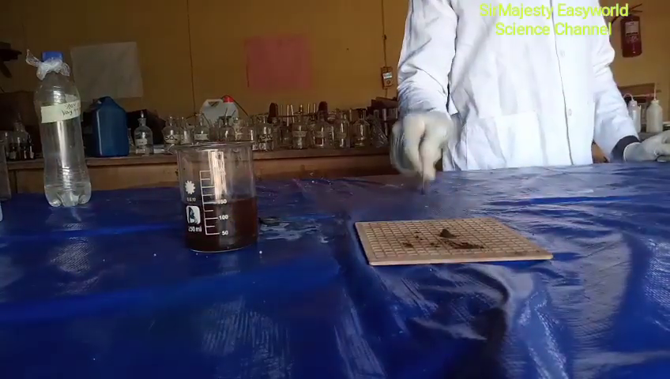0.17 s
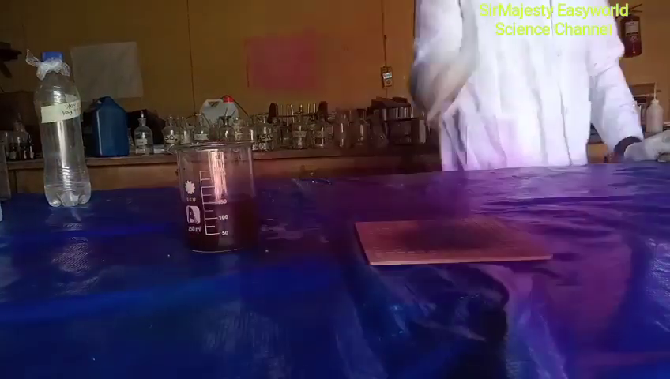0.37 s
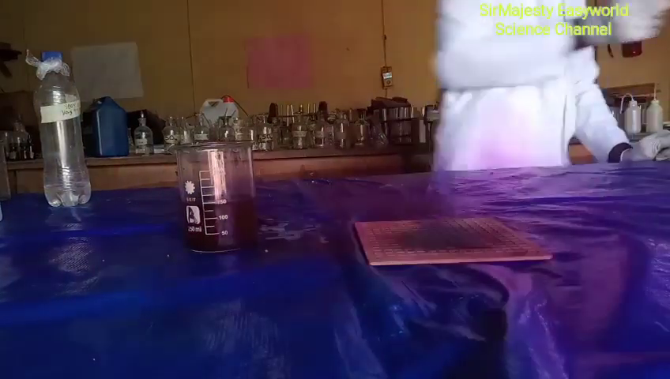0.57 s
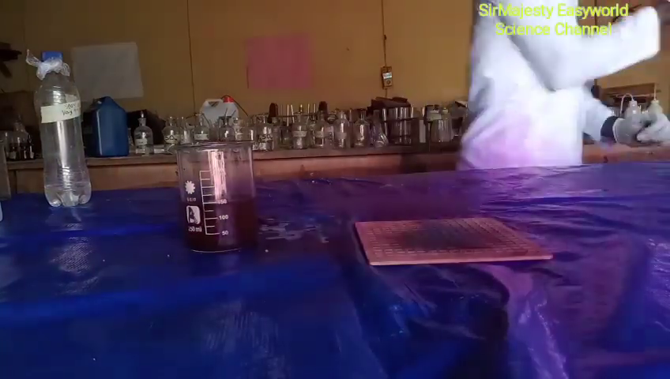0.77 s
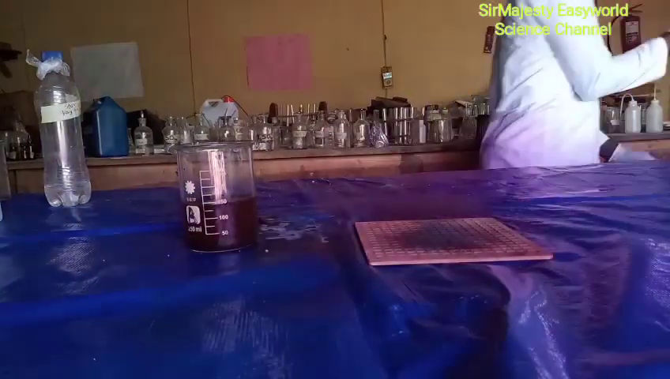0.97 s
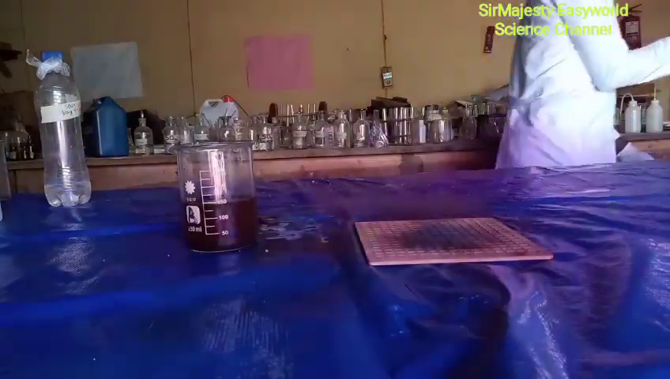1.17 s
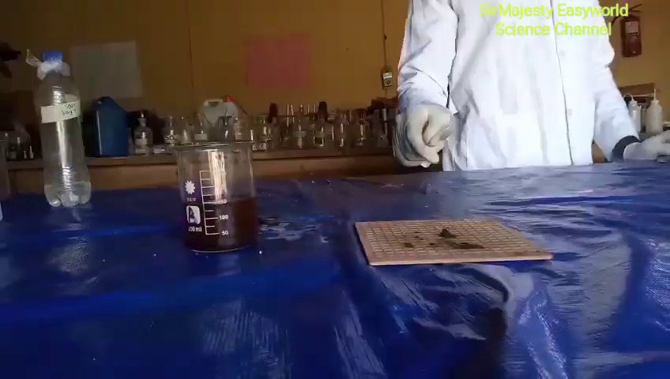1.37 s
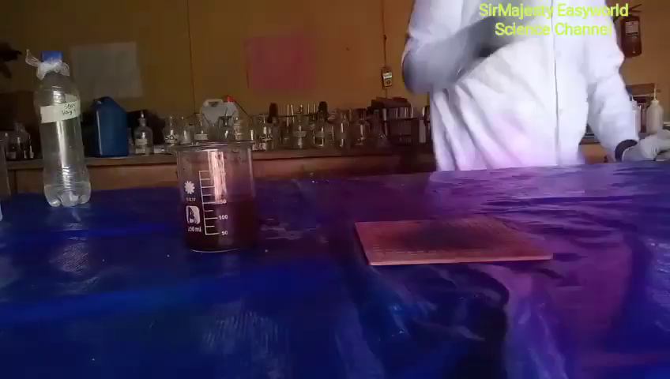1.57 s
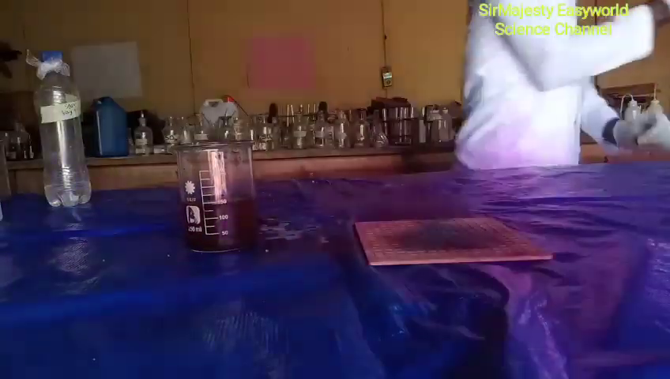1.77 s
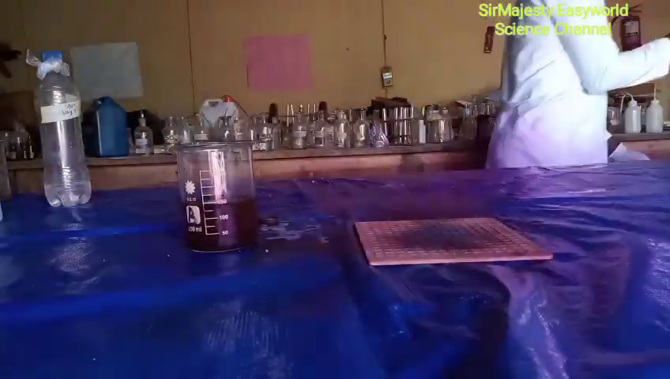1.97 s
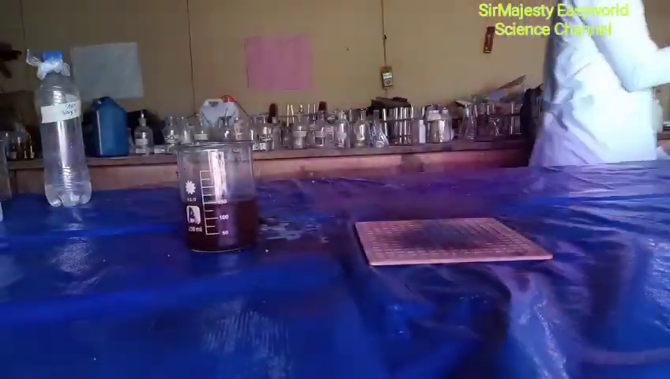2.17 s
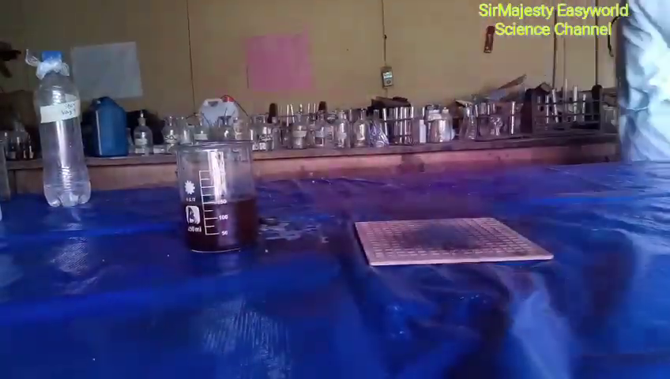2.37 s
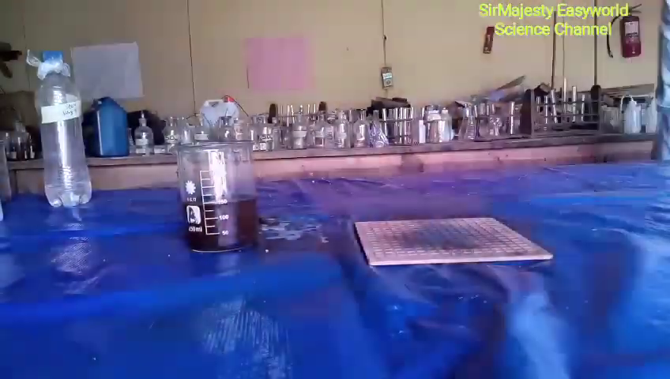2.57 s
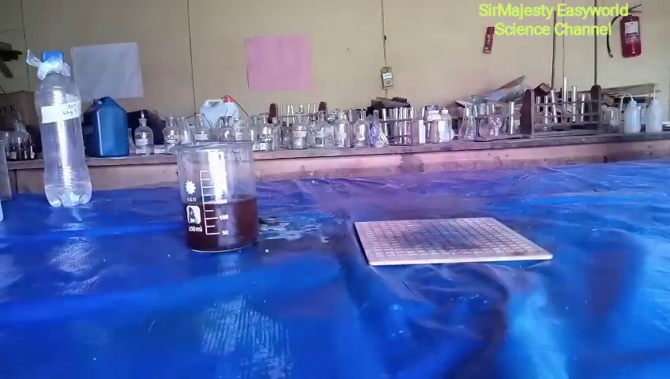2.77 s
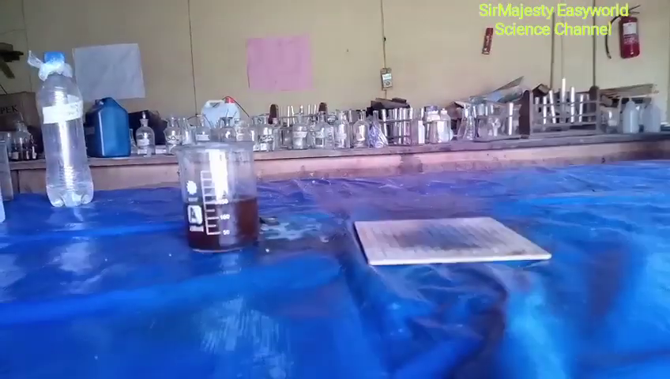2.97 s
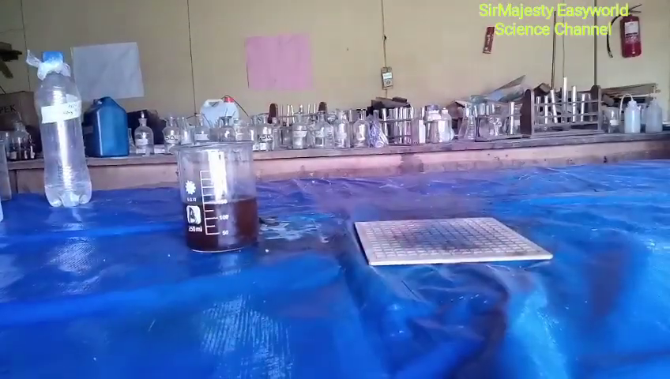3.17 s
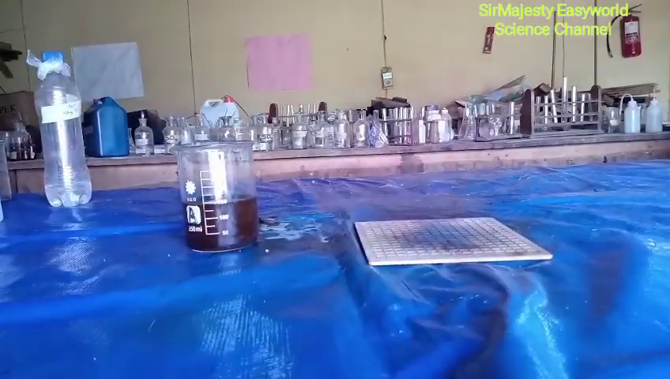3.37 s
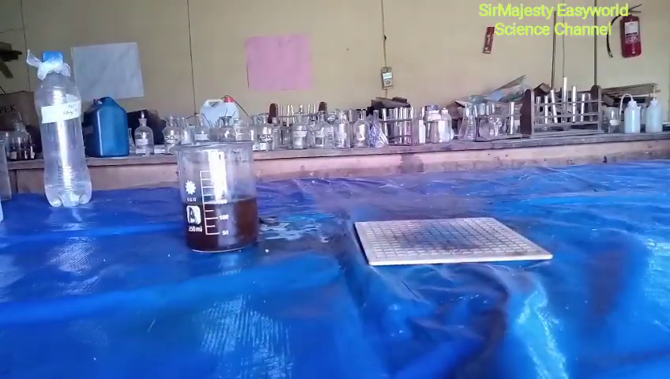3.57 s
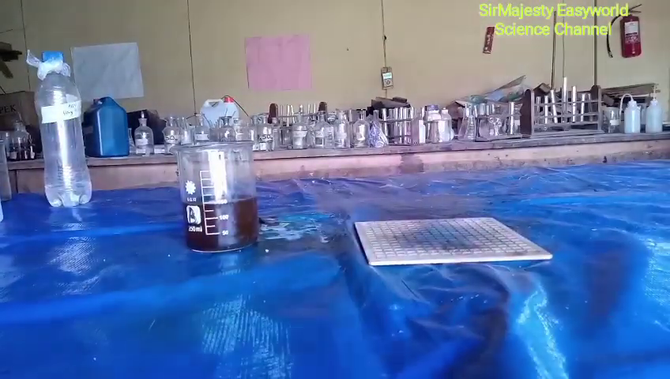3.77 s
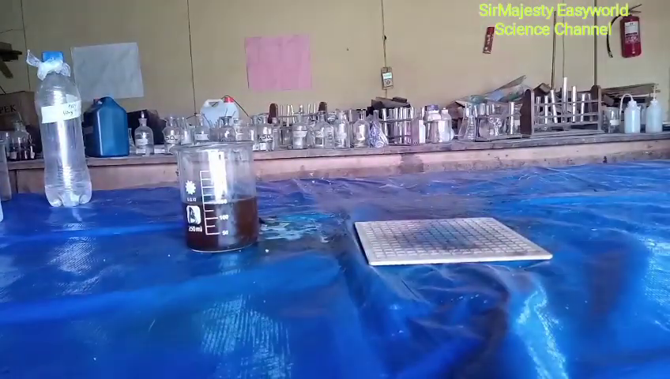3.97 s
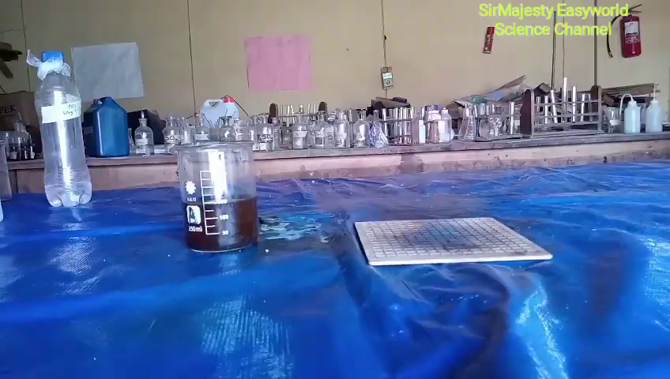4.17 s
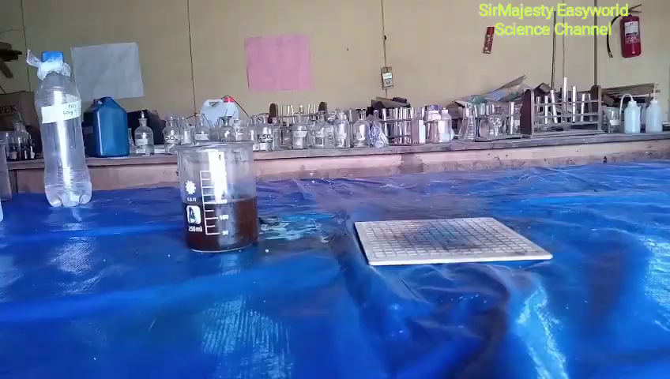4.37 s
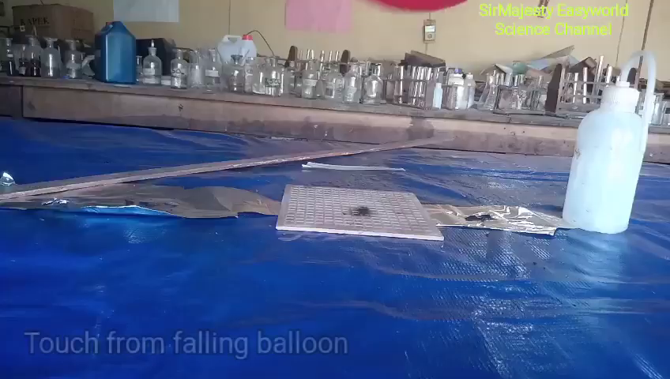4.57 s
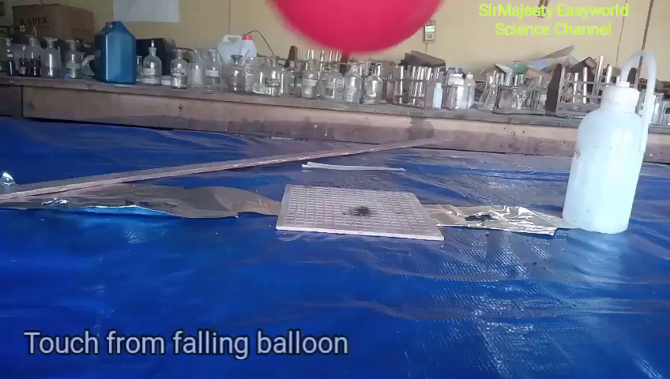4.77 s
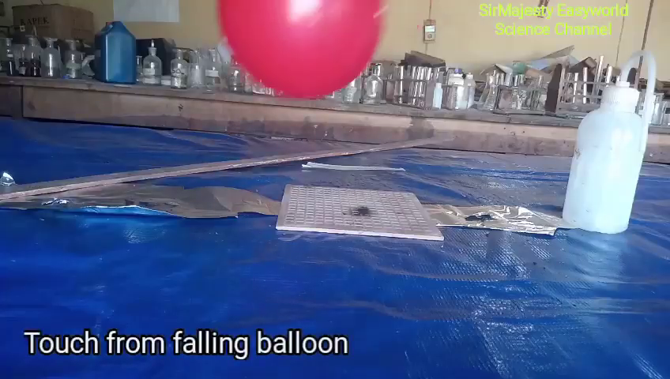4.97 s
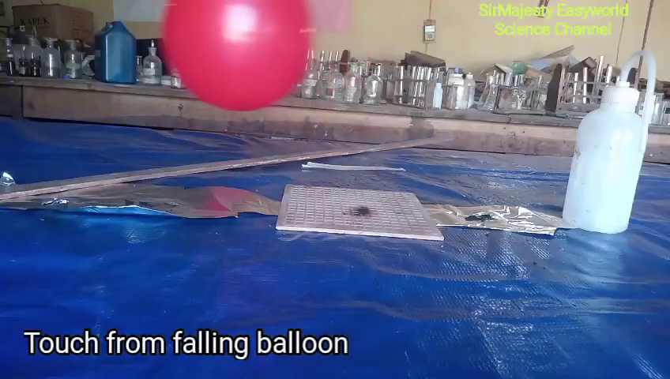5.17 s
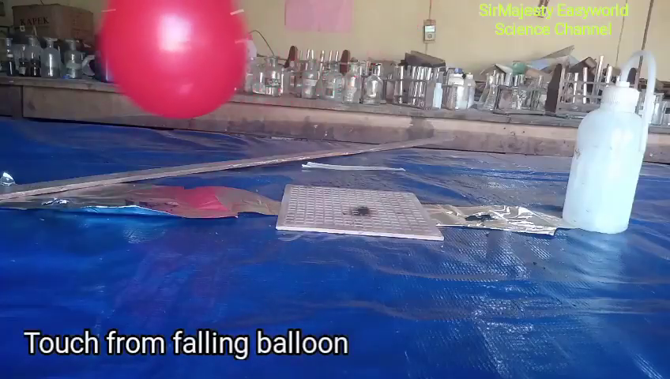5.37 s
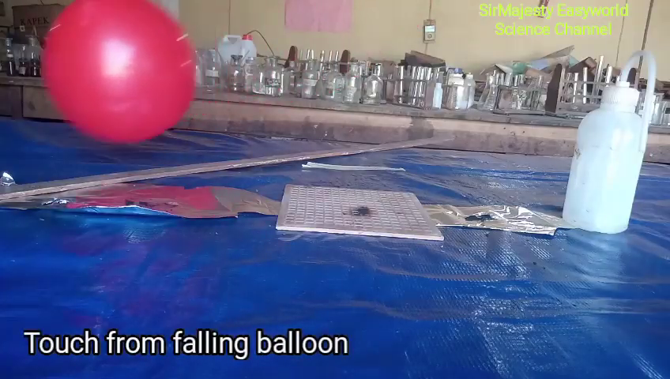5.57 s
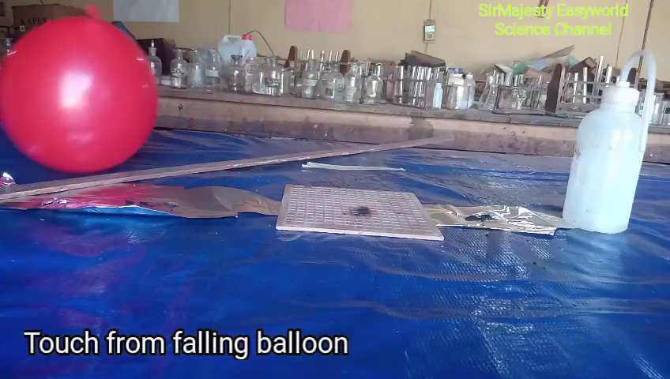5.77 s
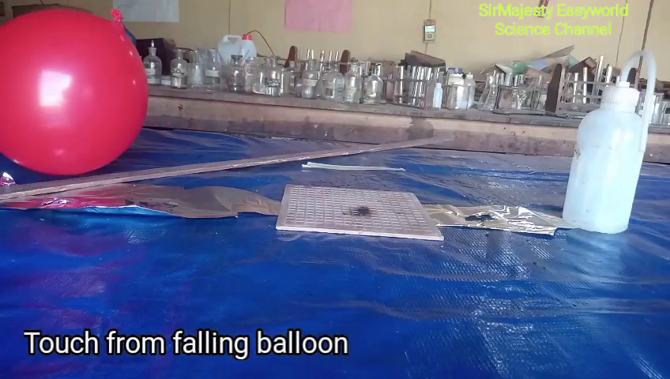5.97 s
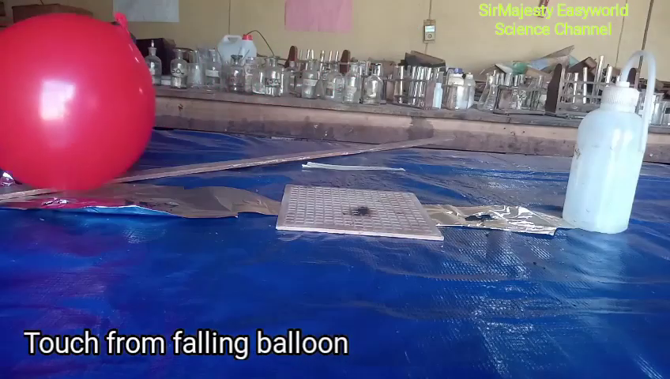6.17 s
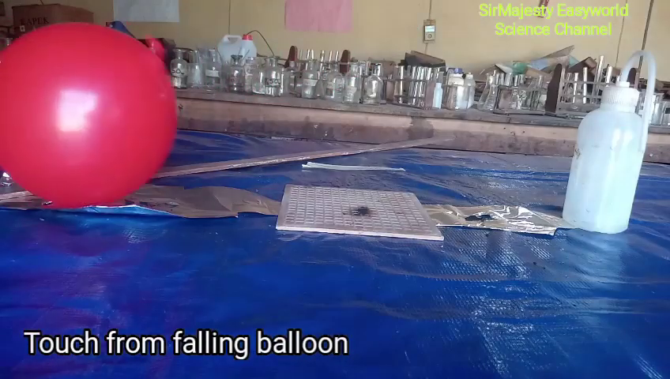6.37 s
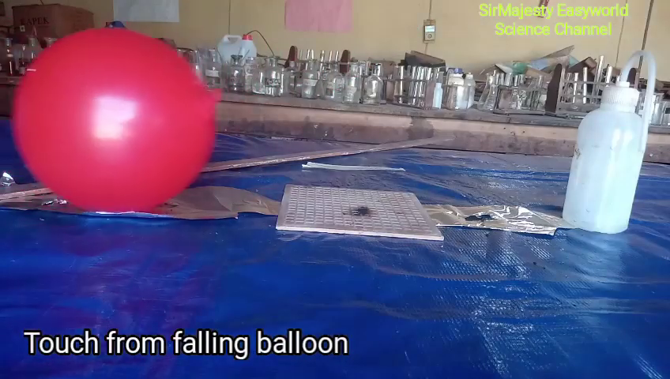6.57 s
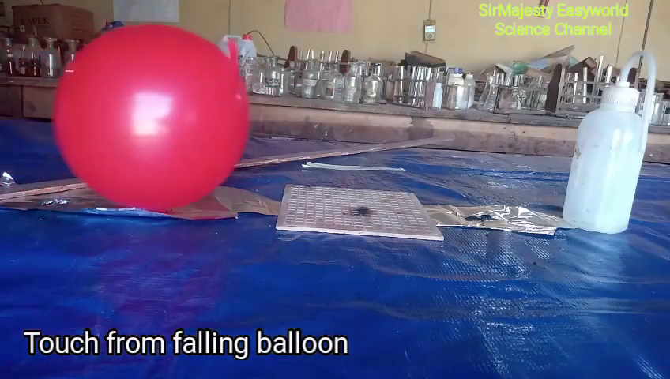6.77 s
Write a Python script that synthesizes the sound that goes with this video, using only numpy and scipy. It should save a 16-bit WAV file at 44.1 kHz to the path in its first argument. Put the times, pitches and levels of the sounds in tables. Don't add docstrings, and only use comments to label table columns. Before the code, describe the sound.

In a hard-walled laboratory, a rod knocks lightly and a small explosive pile cracks, overloading the nearby recorder into a harsh roar that dims and rings away. After an abrupt cut, a second crack decays faster. Cloth and plastic rustle, a distant bird whistles and low traffic throbs. Another cut brings a steady engine drone with fan hiss and a brief balloon rub.

```python
import sys
import numpy as np
from scipy import signal
from scipy.fft import rfft, irfft, next_fast_len
from scipy.io import wavfile
from scipy.ndimage import uniform_filter1d, map_coordinates

SR = 44100
rng = np.random.default_rng(int(sys.argv[2]) if len(sys.argv) > 2 else 0)


def how_loud(loudness_db):
    steps = np.asarray(loudness_db, float) / 20
    return 10 ** steps


def put_to_file(sound):
    columns = np.atleast_2d(sound).T
    safe = np.clip(columns, -1, 1)
    whole_steps = np.round(safe * 32767)
    wavfile.write(sys.argv[1], SR, whole_steps.astype(np.int16))


N = 304290
T = np.arange(N) / SR
EDGE_HZ, TOP_HZ = 6800, 15520

# (start [s], end [s])
CUTS = [
    (1.491, 1.513),
    (4.506, 4.521),
]
(TAKE_1_END, TAKE_2_START), (TAKE_2_END, TAKE_3_START) = CUTS


def unit(x):
    return x / np.sqrt(np.mean(x ** 2) + 1e-20)


def along(points, hz):
    f, v = np.transpose(points)
    return np.interp(np.log(hz + 1), np.log(f + 1), v)


def wobble(rate):
    s = np.append(T[::16], N / SR)
    knots = rng.standard_normal(int(N * rate / SR) + 4)
    return np.interp(T, s, map_coordinates(knots, [s * rate]))


def swell(s, db, hold, rise, t60):
    fall = np.maximum(s - T, 0) / abs(rise) + np.maximum(T - s - hold, 0) / abs(t60)
    return how_loud(db) * np.exp(-np.log(1000) * fall)


def filtered(x, response):
    m = next_fast_len(N + SR // 2)
    return irfft(rfft(x, m) * response(np.fft.rfftfreq(m, 1 / SR)), m)[:N]


def recorder(hz):
    step = lambda edge_hz: .5 + .5 * np.tanh((hz - edge_hz) / 40)
    return how_loud(-10 * step(EDGE_HZ) - 30 * step(TOP_HZ) - 9 / (1 + (hz / 100) ** 6))


def noise(shape_db, patchy_db):
    hz, s, z = signal.stft(rng.standard_normal(N), SR, nperseg=1024)
    hz = hz[:, None]
    field = uniform_filter1d(rng.standard_normal(z.shape), size=10, axis=0)
    field = uniform_filter1d(field, size=4, axis=1)
    gain = how_loud(shape_db(hz, s) + 0 * s) / recorder(np.minimum(hz, 15000))
    gain = gain / np.sqrt(np.mean(gain ** 2, axis=0)) * how_loud(patchy_db * unit(field))
    return unit(signal.istft(z * gain, SR, nperseg=1024)[1][:N])


def coloured(spectrum, patchy_db):
    return noise(lambda hz, s: along(spectrum, hz), patchy_db)


def hum(gain):
    white = rng.standard_normal(N)
    return filtered(white, lambda hz: gain(hz) / recorder(hz)) / np.std(filtered(white, gain))


def ringing(s, modes):
    t = np.maximum(T[:SR] - s, 0)
    ring = sum(how_loud(db - 60 * t / t60) * np.sin(2 * np.pi * hz * t) for hz, db, t60 in modes)
    return np.pad((1 - np.exp(-t / 0.00038)) * ring, (0, N - SR))


# (frequency [Hz], width [Hz])
THROB = (60, 7.6)
# (frequency [Hz], level [dB per Hz])
RUMBLE_COLOUR = [(15, -38.5), (30, -13.5), (90, -2), (140, 2), (220, -7), (350, -16), (600, -30.5),
                 (900, -120)]
# (frequency [Hz], level [dB per Hz])
AIR_COLOUR = [(120, -30.5), (200, -1.5), (894, -10), (1620, -12), (2170, -15), (4550, -19), (5680, -10),
              (8220, -35.5), (15100, -37.5), (16600, -48)]
# (time [s], hold [s], throb [dB], rumble [dB])
SWELLS = [(0.018, .26, -47.5, -62.5), (.37, .08, -64, -69), (.88, .13, -67, -55.5), (1.08, 0.11, -75, -61),
          (1.24, 0.12, -54.5, -64.5), (1.53, .08, -51, -67), (1.69, .03, -57, -63), (2.03, 0.023, -63, -55),
          (2.17, 0.061, -55, -66), (2.377, .02, -49.5, -66), (2.497, .03, -66, -60),
          (2.57, 0.14, -52.5, -65.5), (2.95, .12, -60, -63), (3.392, .05, -57, -70), (3.599, .2, -76, -72),
          (4.009, .1, -61, -61.5), (4.17, 0.082, -56, -60.5), (4.479, .03, -64, -57.5)]


def room():
    throb_gain, rumble_gain = how_loud(-70), how_loud(-73)
    for s, hold, throb_db, rumble_db in SWELLS:
        shape = swell(s, 0, hold, rise=.09, t60=0.075)
        throb_gain = throb_gain + how_loud(throb_db) * shape
        rumble_gain = rumble_gain + how_loud(rumble_db) * shape
    centre_hz, width_hz = THROB
    throb = hum(lambda hz: 1 / (1 + ((hz - centre_hz) / width_hz) ** 4))
    throb /= np.sqrt(np.abs(uniform_filter1d(throb ** 2, size=2500))) / 2.5 + .3
    rumble = hum(lambda hz: how_loud(along(RUMBLE_COLOUR, hz))) * how_loud(3 * wobble(14))
    air = how_loud(-67.5 + 1.5 * wobble(6)) * coloured(AIR_COLOUR, patchy_db=3.5)
    quiet = how_loud(2) * throb_gain * throb + how_loud(0.5) * rumble_gain * rumble + air
    return quiet * (T < TAKE_2_END)


# (time [s], length [s], level [dB], first [Hz], last [Hz])
BIRD_NOTES = [
    (2.345, 0.066, -60.5, 3480, 3380),
    (2.516, .19, -54, 3660, 2880),
    (2.931, .14, -58, 3330, 3470),
    (3.085, .06, -59, 3100, 3080),
    (3.21, .12, -58, 3450, 2920),
]


def bird():
    out = np.zeros(N)
    for s, length, db, first_hz, last_hz in BIRD_NOTES:
        slide = 1 - np.clip(1 - (T - s) / length, 0, 1) ** 1.6
        pitch = first_hz + (last_hz - first_hz) * slide
        turn = 2 * np.pi * np.cumsum(pitch + 60 * wobble(40)) / SR
        blur = wobble(750) * np.cos(turn) + wobble(750) * np.sin(turn)
        echoes = 0.88 * how_loud(2.9 * wobble(45)) * swell(s, 0, length, 9, .15) * blur
        whistle = 0.5 * how_loud(3.1 * wobble(60)) * np.sin(turn)
        sag = how_loud(0.0036 * (pitch - first_hz))
        out += swell(s, db, length, rise=0.078, t60=.16) * sag * (echoes + whistle)
    return out


# (time [s], firings per second [Hz])
SPEED = [(4.53, 23.22), (5.3, 23.4), (5.53, 23.2), (5.7, 22.92), (6.1, 23.1), (6.3, 23.0), (6.4, 22.9),
         (6.9, 22.8)]
# (frequency [Hz], level [dB])
WEAK_HARMONICS = [(23, -34), (46, -17), (70, -25), (115, -13.5), (255, -21), (350, -19), (800, -18),
                  (1100, -17.5)]
FAVOURED_ORDERS = [6, 7, 8, 9, 10, 12, 13, 14, 17, 20, 25, 28, 39, 40]
# (light load [dB], heavy load [dB])
FAVOURED_DB = [(-3, -12.5), (-4, -9.5), (0, 1), (-14, -0.5), (-12, -6.5), (-3, -5), (-11.5, -18),
               (-6.5, -18), (-15, -11.5), (-10.5, -2.5), (-12, -26), (-9, -10.5), (-11.5, -15), (-13, -9.5)]
# (frequency [Hz], level [dB per Hz])
DRONE_COLOUR = [(12, -50), (20, -10.5), (87, -10.5), (174, 5.5), (233, -3), (286, 2.5), (369, -14.5),
                (783, -11.5), (906, -9), (1600, -19.5), (2080, -54.5), (3520, -120)]
# (frequency [Hz], level [dB per Hz])
FAN_COLOUR = [(710, -24), (1200, -3.5), (1400, -1.5), (1800, -8), (2290, -7), (2680, -5.5), (4110, -8),
              (5650, -1.5), (6520, -8.5), (8300, -35.5), (10900, -44), (12600, -41), (13600, -47),
              (15500, -32), (16600, -78)]
IDLE_RATE, FULL_LOAD_SAG_HZ = 23.3, 0.46
EXHAUST_DB, LOAD_DB_PER_HZ, FAN_DB = -35, 4.5, -37


def generator():
    rate = np.interp(T, *np.transpose(SPEED))
    on = slice(int(TAKE_2_END * SR), N)
    turn = 2 * np.pi * np.cumsum(rate * (1 + .001 * wobble(9))) / SR
    load = np.clip((IDLE_RATE - rate[on]) / FULL_LOAD_SAG_HZ, 0, 1)
    favoured = dict(zip(FAVOURED_ORDERS, FAVOURED_DB))
    lines = np.zeros(N)
    for k in range(1, 49):
        light_db, heavy_db = favoured.get(k, [along(WEAK_HARMONICS, k * IDLE_RATE)] * 2)
        loose = k / 20
        level_db = light_db + load * (heavy_db - light_db) + (.7 + 1.2 * loose) * wobble(5)[on]
        scatter = loose * (2.2 * rng.uniform(-1, 1) + .35 * wobble(8)[on])
        lines[on] += how_loud(level_db) * np.cos(k * turn[on] + scatter)
    lines[on] = unit(lines[on])
    puff = how_loud(0.5 * np.cos(turn))
    drone = hum(lambda hz: how_loud(along(DRONE_COLOUR, hz) - 6 * (hz > 110) * (hz < 340)))
    hiss = how_loud(FAN_DB + 0.61 * wobble(6)) * coloured(FAN_COLOUR, patchy_db=0.6)
    exhaust_gain = how_loud(EXHAUST_DB + LOAD_DB_PER_HZ * (IDLE_RATE - rate))
    exhaust = exhaust_gain * (how_loud(-1.7) * lines + how_loud(-7) * puff * drone)
    return (exhaust + hiss) * np.clip((T - TAKE_3_START) / .012, 0, 1)


# (time [s], level [dB], hold [s], t60 [s])
MOVES = [(0, -74.5, 0.12, .3), (.3, -74, 0.23, .3), (1.398, -51.5, .02, 0.76), (1.56, -72, 0.059, .6),
         (2.279, -49.5, 0.0096, 0.17), (2.358, -51.5, .05, .2), (2.502, -52, 0.19, .12),
         (2.55, -51.5, 0.042, 0.28), (2.916, -56, 0.091, 0.15), (2.947, -59, 0.026, 0.25),
         (3.125, -59, .01, 0.24), (3.31, -67, .01, .3), (3.39, -65, .01, .3), (3.52, -63, .01, 0.401),
         (3.581, -51, .01, 0.4), (4.05, -65, .07, .3), (4.15, -60, .01, .7), (4.42, -69.5, .08, .3)]
# (frequency [Hz], level [dB per Hz])
CLOTH_COLOUR = [(2200, -30), (3300, -18), (4300, -10), (5000, -3.5), (5800, 3.5), (6700, -12.5),
                (7600, -30), (13000, -57), (15400, -30), (16600, -72)]
# (time [s], peak [dB])
SNAPS = [(.1, -44), (1.4017, -41), (1.4276, -43), (3.063, -50), (3.1183, -54), (3.5184, -55), (3.573, -39),
         (4.0527, -58)]
# (time [s], level [dB], rise [s], t60 [s])
SCUFF = (2.54, -58, .2, .2)


def rustle():
    sheet = coloured(CLOTH_COLOUR, patchy_db=2.0)
    snaps = sum(how_loud(db - 8 - 60 * np.abs(T - s) / 0.021) * (T > s) for s, db in SNAPS)
    moves = how_loud(-80) + sum(swell(s, db, hold, .09, t60) for s, db, hold, t60 in MOVES)
    s, db, rise, t60 = SCUFF
    scuff_gain = swell(s, db, 0, rise, t60) + swell(s, db - 16, .03, rise, .8)
    scuff_colour = [(400, -25), (800, -8), (1500, 5), (2300, -5), (3200, -28)]  # (frequency [Hz], level [dB per Hz])
    scuff = scuff_gain * coloured(scuff_colour, patchy_db=6.5)
    heard = ((T < TAKE_1_END) | (T > TAKE_2_START)) * (T < TAKE_3_START)
    return ((moves * how_loud(2.2 * wobble(90)) + snaps) * sheet + scuff) * heard


# (time [s], level [dB], hold [s])
SLEEVE = (1.2, -61, .05)
# (frequency [Hz], level [dB per Hz])
SWISH_COLOUR = [(6000, -25), (7200, 1.5), (8500, -12), (9500, -4), (12500, -4), (13500, -14), (15200, 0),
                (16000, -30)]


def sleeve():
    return swell(*SLEEVE, rise=.2, t60=.2) * coloured(SWISH_COLOUR, patchy_db=2.1)


# (frequency [Hz], level [dB])
BRUSH_COLOUR = [(4000, 0), (5800, 34), (8000, 7), (9000, -5), (11000, -8), (12300, 2), (13800, -10),
                (15300, 6), (16000, -30)]
# (time [s], flick [dB], brushing [dB])
FLICKS = [
    (5.608, -34, -42),
    (5.640, -32, -43),
    (5.808, -60, -45),
]


def balloon():
    drag = swell(5.56, -56, 0.37, .1, .1)
    for s, flick_db, brush_db in FLICKS:
        drag = drag + swell(s, flick_db, 0, 0.014, 0.016) + swell(s, brush_db, 0, .25, .13)
    return drag * coloured(BRUSH_COLOUR, patchy_db=-0.5)


# (time [s], level [dB], lower modes [dB])
TAPS = [
    (.1240, -25.5, 2),
    (.1290, -24, -8),
]
# (frequency [Hz], level [dB], t60 [s])
ROD_MODES = [(1240, -16, 0.022), (1740, -6, 0.025), (3240, 6, 0.011), (3480, -10, 0.014), (4530, -10, .03),
             (5280, 3, 0.02), (5470, -8, 0.017), (6500, -13, 0.015)]
# (frequency [Hz], level [dB], t60 [s])
LINGER = [(1750, -25, .45), (3200, -29, .4), (4560, -25, .4), (5250, -24, .3), (6400, -30, .3),
          (620, -32, .3)]
# (time [s], level [dB], hold [s], t60 [s])
TAP_TAIL = [
    (.136, -44, 0.00079, .39),
    (1.522, -48, 0.024, .12),
]
# (frequency [Hz], level [dB per Hz])
TAP_COLOUR = [(240, -49), (400, -14), (620, -8), (950, -12.5), (1180, -20), (1270, 2.5), (1440, -10),
              (1730, 0.5), (2620, -17), (2760, -8.5), (3240, -3), (4070, -10.5), (5220, 2), (6550, -18),
              (8000, -54), (10400, -84), (17600, -120)]


def rod():
    knocks = np.zeros(N)
    for s, db, low_db in TAPS:
        modes = [(hz, g + low_db * (hz < 4000), t60) for hz, g, t60 in ROD_MODES]
        knocks += how_loud(db) * ringing(s, modes)
    linger = how_loud(TAPS[0][1]) * ringing(TAPS[0][0], LINGER)
    later_s = TAP_TAIL[1][0] - TAP_TAIL[0][0] - .02
    again = np.roll(linger, round(later_s * SR)) * swell(TAKE_2_START, -3, .04, .01, .5)
    knocks += (linger + again) * how_loud(3 * wobble(40))
    tail = sum(swell(s, db, hold, .03, t60) for s, db, hold, t60 in TAP_TAIL)
    return knocks + tail * coloured(TAP_COLOUR, patchy_db=0)


# (frequency [Hz], level [dB per Hz])
ROAR_COLOUR = [(95, -40.5), (140, -21.5), (300, -13), (500, -9), (900, -2.5), (2000, 1), (3000, -3),
               (4000, -11.5), (5450, 0.5), (6500, -12.5), (7200, -28), (11500, -54.5), (15300, -34),
               (16600, -80.5)]
# (frequency [Hz], t60 [s])
ROOM_T60 = [(100, 0.48), (300, 1), (700, 1.15), (1400, 1.2), (2700, 1.095), (4200, 1.1), (5400, 0.94),
            (6800, 0.82), (9000, .7), (15000, .7)]
# (frequency [Hz], level [dB], t60 [s])
GLASS = [(2023, -48, 1.1), (4877, -56, 1.1)]
# (time [s], ageing speed of the tail [ratio], heard until [s])
BLASTS = [
    (.485, 1, 1.5),
    (1.729, 1.7, 2.42),
]
PINNED_DB, PINNED_S, TURN_DB, TURN_S = -6.5, .19, 10.5, .09
SHELF_DB_PER_S, SHELF_END_S, DYING_DB_PER_S = 12, .495, 72


def blasts():
    out = np.zeros(N)
    for start, pace, end in BLASTS:
        def fading(hz, s):
            tail_age = pace * np.clip(s - start, 0, 1)
            return along(ROAR_COLOUR, hz) - 60 * (tail_age - .4) / along(ROOM_T60, hz)

        age = pace * np.maximum(T - start, 0)
        roar_db = PINNED_DB - TURN_DB * np.clip((age - PINNED_S) / TURN_S, 0, 1)
        roar_db -= SHELF_DB_PER_S * np.maximum(age - PINNED_S, 0)
        roar_db -= DYING_DB_PER_S * np.maximum(age - SHELF_END_S, 0)
        over_db = 13 * np.clip(1 - age / .22, 0, 1)
        rise = np.clip((T - start) / .0008, 0, 1) ** 2
        roar_gain = rise * (T < end) * how_loud(roar_db + over_db + 0.53 * wobble(60))
        out += roar_gain * noise(fading, patchy_db=1.5)
        u = age / pace / .0015
        out -= u * np.exp(1 - u)
        singing = (T < end) * np.clip((age - .35) / 0.29, 0, 1) * how_loud(2 * wobble(11.96))
        for hz, db, t60 in GLASS:
            out += singing * how_loud(db - 60 * (age - .7) / t60) * np.sin(2 * np.pi * hz * T)
    return out


def scene():
    background = room() + bird() + generator()
    handling = rustle() + sleeve() + balloon()
    return (background + handling + rod() + blasts())[None]


def roll_off(x):
    return signal.sosfilt(signal.butter(12, 16740, fs=SR, output="sos"), x)


# (time [s], peak [dB])
GAIN_TICKS = [(0.6794, -22.5), (0.8779, -26), (1.0779, -50.5), (1.279, -52), (1.479, -61), (1.8794, -25),
              (2.0787, -38), (2.2787, -51), (3.6794, -56)]


def record(dry):
    x = dry[0] / (1 + np.abs(dry[0] / .85) ** 6) ** (1 / 6)
    for s, db in GAIN_TICKS:
        x[round(s * SR)] += how_loud(db + 16)
    x = filtered(x, lambda hz: recorder(hz) * hz ** 2 / (hz ** 2 + 15 ** 2))
    for a, b in CUTS:
        x = x * np.clip(np.maximum(a - T, T - b) / .002, 0, 1)
    return roll_off(np.clip(x, -1, 1)[None])


dry = scene()
out = record(dry)
put_to_file(out)
```